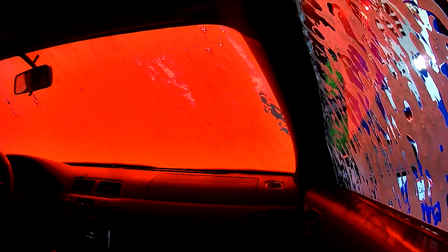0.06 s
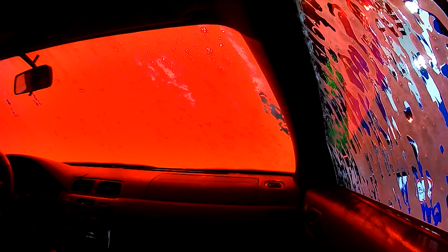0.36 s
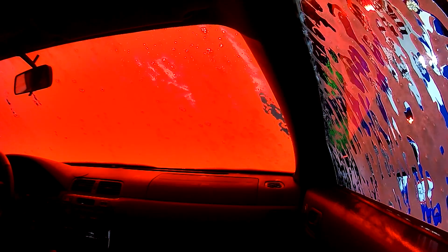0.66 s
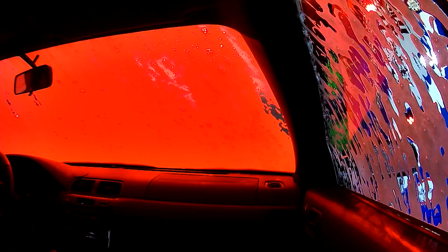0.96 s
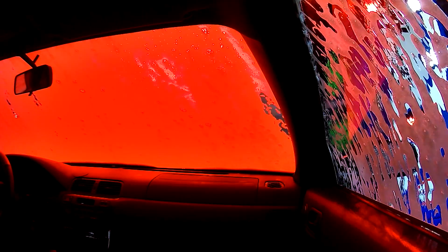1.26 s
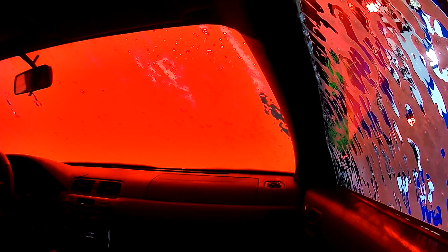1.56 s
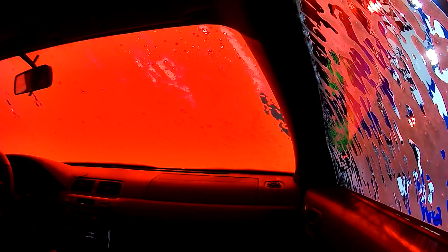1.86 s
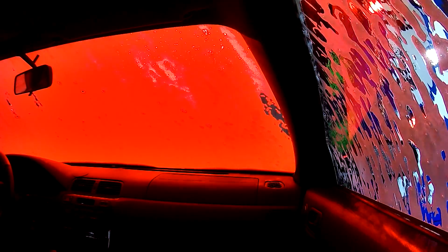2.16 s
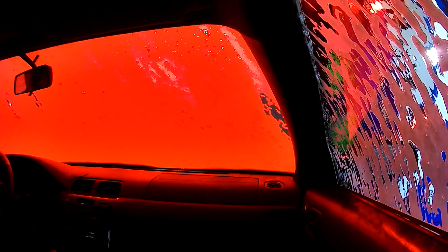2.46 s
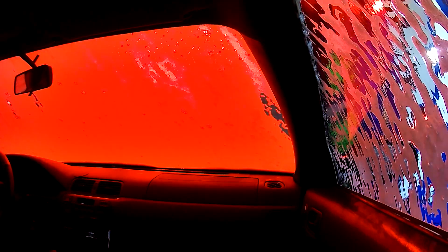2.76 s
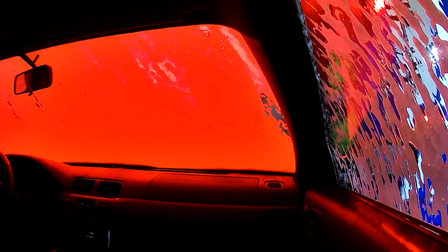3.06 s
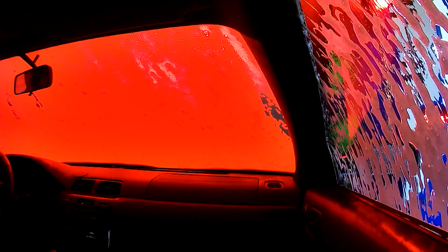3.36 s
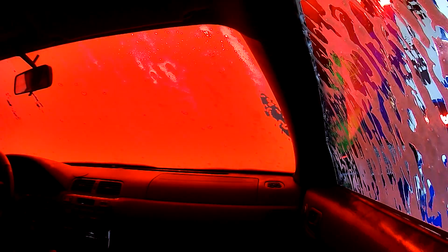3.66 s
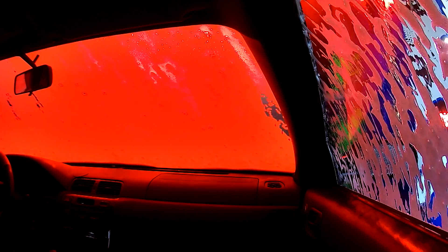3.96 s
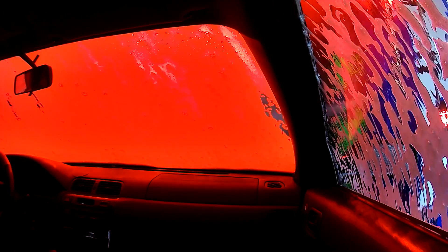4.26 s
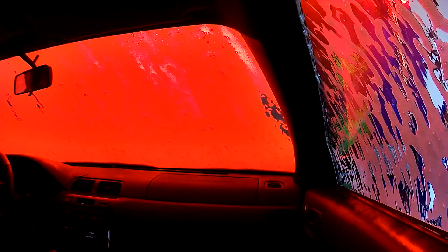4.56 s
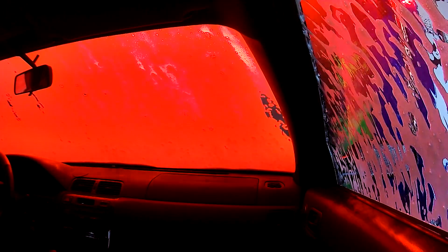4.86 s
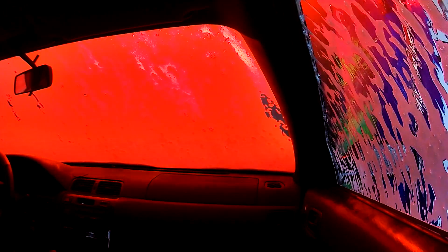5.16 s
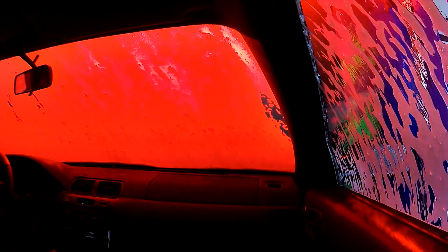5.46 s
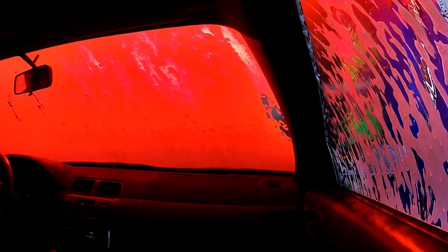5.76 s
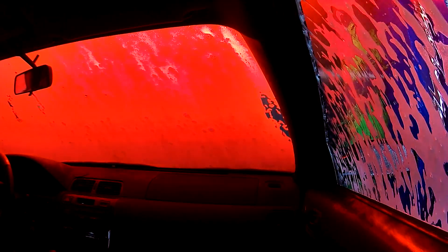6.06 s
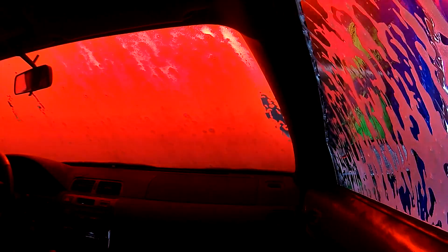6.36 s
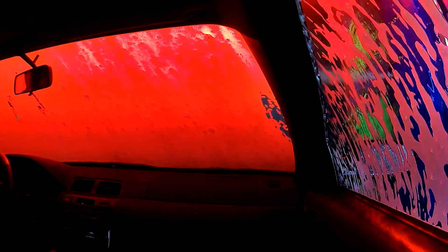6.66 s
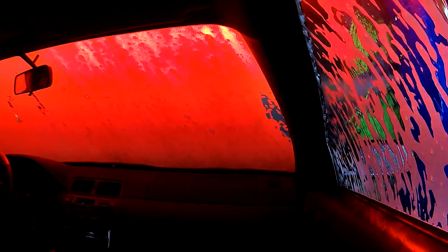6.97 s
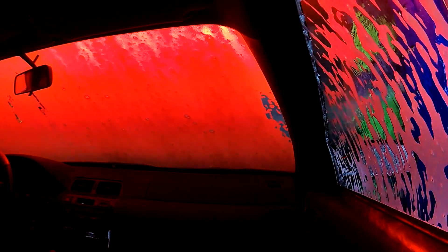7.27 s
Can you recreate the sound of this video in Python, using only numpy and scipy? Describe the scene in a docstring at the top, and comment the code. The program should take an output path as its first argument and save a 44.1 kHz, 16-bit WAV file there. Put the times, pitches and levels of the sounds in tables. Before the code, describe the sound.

Inside a car wash, water patters on the windows while cloth strips thump the panels and swish over the glass, building to a low boom.

```python
"""Car wash from inside

A stereo microphone pair sits in a closed car, glass close on every side, as a rotating brush works
its way in from the right. Wet cloth strips drum on the panels and set the cabin booming; bunches of
them swish and splat over the foamy glass, and some strips land with a heavy slap. Behind it all,
water spray patters steadily on the windows."""
import sys
import numpy as np
from scipy import signal
from scipy.fft import rfft, irfft
from scipy.io import wavfile
from scipy.ndimage import uniform_filter1d

SR = 44100
rng = np.random.default_rng(int(sys.argv[2]) if len(sys.argv) > 2 else 0)


def store_wav(level_fs):
    """Save 16-bit WAV to argv[1]."""
    pcm = np.round(np.clip(np.atleast_2d(level_fs), -1, 1) * 32767)
    wavfile.write(sys.argv[1], SR, pcm.T.astype(np.int16))


N = 323253
TIME = np.arange(N) / SR
HZ = np.maximum(np.arange(N // 2 + 1) * SR / N, 1)

# resonances of the cabin air and of the windows: f/Hz, width/Hz, level/dB re the plain sound
CABIN_MODES = [(68.4, 43, -6.5), (118.7, 8.7, -11), (171.4, 19, -6.5), (274, 4.8, -28.5)]
GLASS_MODES = [(788, 35, -0.5), (900, 17, -13), (1302, 14, -7), (1770, 17, -13.5), (2720, 100, -8),
               (3240, 71, -5.5)]
# stereo balance of the panels and of the glass at the microphones: f/Hz, left minus right/dB
PANEL_BALANCE = [(80, -4.5), (140, -0.5), (320, -1), (420, 5.5), (560, 0)]
GLASS_BALANCE = [(320, -10), (440, -0.5), (650, 0), (1000, 1.5), (1400, -1.5), (2500, -0.5), (3600, -1.5),
                 (5500, 5.5), (9000, 2.5)]


def drumming(strips_per_s=600, gain_db=-0.5):
    """Soft strips beat on the sheet metal; more of them reach it as the brush presses in."""
    approach = [(0, -26), (1.2, -25), (3.3, -24), (4.3, -22), (5.0, -21.5), (5.8, -19.5), (7.33, -20)]  # the brush closing in: t/s, relative level/dB
    colour = [(30, -42.5), (60, -25), (90, -7.5), (115, 0.5), (145, -0.5), (205, 1), (290, 0.5),
              (390, -10.5), (520, -13.5), (740, -20), (1000, -31.5), (1600, -37), (8000, -100)]  # the panels heard from inside: f/Hz, level/dB
    level = from_db(in_time(approach))
    beats = impacts(strips_per_s * level / level.mean(), spread_db=0.0)
    panels = through_body(beats, colour, PANEL_BALANCE, CABIN_MODES)
    return level * from_db(gain_db) * evened(panels, span_s=0.091)


def boom(waver_db=0.65):
    """The brush's weight and shoves pump the cabin's lowest air resonance, from rumble into drone."""
    leaning = [(0, -31), (1.9, -30), (3.0, -34.5), (3.6, -28), (5.0, -28), (5.7, -29.5), (6.05, -22.5),
               (6.35, -24.5), (6.7, -19.5), (7.33, -22.5)]  # weight of the brush on the body: t/s, level/dB
    shoves = [(1.05, -19), (2.41, -22), (4.6, -23), (4.99, -20.5), (5.98, -21), (6.125, -13), (6.2, -18.5),
              (6.455, -21), (6.52, -21.5), (6.8, -19), (7.15, -14)]  # heavier pushes: t/s, level/dB
    colour = [(8, -28), (30, -16.5), (45, -13), (60, -6), (74, -2), (88, -4), (110, -13), (170, -32.5),
              (700, -100)]  # rumble in the cabin: f/Hz, level/dB
    drone_path = [(5.8, 86, 0), (5.97, 83, .3), (6.15, 74, .45), (6.3, 60, .45), (6.48, 73, .45),
                  (6.7, 66, .4), (6.84, 72, .5), (6.98, 68, .35), (7.16, 77, .65), (7.33, 72, .25)]  # the body pressed hard: t/s, f/Hz, share of the boom's power/0-1
    rumble = through_body(impacts(700, spread_db=-1.0), colour, modes=CABIN_MODES)
    rumble = evened(rumble, span_s=0.11)
    hz, share = in_time(drone_path)
    power = from_db(in_time(leaning) + waver_db * drift(18.0)) ** 2
    power = power + sum((from_db(db) * bell(s, length_s=0.026)) ** 2 for s, db in shoves)
    drone = wavering(hz, waver=0.055, rate=12.5)
    return np.sqrt(power) * (np.sqrt(1 - share) * rumble + np.sqrt(share) * drone)


def slaps(rise_s=0.0035):
    """Single water-laden strips land softly on a panel, whose pitch depends on the spot they hit."""
    landings = [(0.598, -14, 194), (1.14, -15, 161), (1.312, -12, 148), (1.425, -16, 135), (1.849, -9, 167),
                (2.275, -16, 127), (2.397, -21, 290), (2.588, -15, 156), (2.677, -21, 310),
                (2.887, -19, 149), (2.974, -17, 145), (3.027, -23, 468), (3.108, -17, 233),
                (3.202, -22, 355), (3.471, -24, 506), (3.758, -16, 153), (4.019, -10.5, 170),
                (4.362, -14, 400), (4.492, -16, 240), (4.558, -13, 125), (4.626, -12, 250),
                (4.889, -13.5, 249), (5.107, -14, 273), (5.233, -14.5, 194), (5.386, -15, 425),
                (5.691, -11, 320), (5.836, -12, 250), (5.89, -11, 131), (5.952, -12, 180),
                (6.081, -12, 191), (6.103, -17, 537), (6.168, -7, 174), (6.189, -14, 335), (6.56, -11, 170),
                (6.632, -13, 258), (6.76, -14, 345), (6.779, -10, 158), (6.93, -15, 310), (7.255, -11, 170),
                (7.279, -13, 334)]  # heavy strips: t/s, peak level/dB, f/Hz
    panel_modes = [(.47, -15, .09), (.76, -9, .055), (1, 0, .075), (1.5, -8, .04), (2.0, -13, .03),
                   (2.86, -19, .02)]  # ring of the panel: multiple of f, level/dB, t60/s
    t = np.arange(SR // 8) / SR
    out = np.zeros(N + len(t))
    for s, peak_db, hz in landings:
        scatter_db = rng.standard_normal(len(panel_modes))
        knock = sum(from_db(db + scatter - 60 * t / t60) * np.sin(2 * np.pi * hz * multiple * t)
                    for (multiple, db, t60), scatter in zip(panel_modes, scatter_db))
        knock = knock * (1 - np.exp(-t / rise_s))
        at = round(s * SR)
        out[at:at + len(t)] += from_db(peak_db) * knock / np.abs(knock).max()
    return out[:N]


def bunches():
    """Each bunch of strips swells and fades as it sweeps by; the summed power of (sliding, striking)."""
    # one bunch a turn at first, then several as the brush presses in:
    # t/s, length/s, relative sliding level/dB, relative striking level/dB
    sweeps = [(2.417, 0.024, -42, -41), (2.488, 0.033, -49, -40), (2.75, 0.067, -43.5, -40),
              (3.014, 0.13, -44.5, -41), (3.268, 0.098, -40.5, -46), (3.55, 0.066, -42, -40.5),
              (3.81, 0.058, -37, -42.5), (4.097, 0.044, -32.5, -32.5), (4.358, 0.042, -32.5, -37),
              (4.63, 0.029, -32.5, -36), (4.69, 0.024, -45, -32), (4.883, 0.033, -37, -31),
              (4.915, 0.025, -32.5, -37), (4.958, 0.039, -32.5, -34.5), (5.055, .04, -43, -38),
              (5.123, 0.043, -36.5, -32), (5.193, 0.069, -31, -33), (5.243, 0.024, -32, -33),
              (5.307, .04, -44, -36), (5.36, 0.016, -41, -32.5), (5.4, 0.025, -44, -28.5),
              (5.458, 0.03, -32, -30), (5.508, 0.045, -33, -39), (5.567, 0.022, -36, -35),
              (5.637, 0.016, -32.5, -34), (5.672, 0.019, -31, -32), (5.752, 0.043, -34, -30),
              (5.835, 0.016, -41, -30), (5.903, 0.014, -31.5, -36), (5.936, 0.035, -37, -37),
              (6.028, 0.05, -32, -38), (6.107, 0.04, -39, -34.5), (6.19, 0.025, -32.5, -33),
              (6.312, 0.05, -40, -33.5), (6.374, 0.019, -34.5, -31.5), (6.406, 0.017, -34, -31.5),
              (6.471, 0.031, -35, -32), (6.588, 0.027, -34.5, -31), (6.653, 0.036, -35, -29),
              (6.733, 0.046, -36.5, -32), (6.852, 0.025, -35, -34), (6.914, 0.028, -37, -32),
              (6.954, 0.02, -42, -30.5), (7, 0.027, -32, -39), (7.037, 0.023, -34, -35),
              (7.123, 0.027, -33, -38), (7.195, 0.051, -35.5, -35.5), (7.279, 0.049, -34.5, -33)]
    return sum(np.outer(from_db(db), bell(s, length)) ** 2 for s, length, *db in sweeps)


def thudding(bunch_power, strips_per_s=700, gain_db=3.0):
    """The heavy ends of each bunch hit the door in a short, hollow roll."""
    colour = [(80, -37.5), (250, -8.5), (390, 6), (540, -1.5), (680, -7), (750, -14), (850, -10.5),
              (1200, -27), (6000, -90.5)]  # the door heard from inside: f/Hz, level/dB
    roll = through_body(impacts(strips_per_s, spread_db=3.0), colour, PANEL_BALANCE, GLASS_MODES)
    return np.sqrt(bunch_power) * from_db(gain_db) * evened(roll, span_s=0.079)


def swishing(bunch_power, slips_per_s=5000, flutter_db=1.56, gain_db=6.0):
    """Wet cloth slips over the glass in countless tiny jerks, swelling as each bunch sweeps by."""
    drag = [(0, -44), (1.5, -42.5), (3.4, -42.5), (4.2, -40), (4.7, -36), (5.2, -36), (6, -35), (6.6, -36),
            (7.33, -35.5)]  # strips trailing on the glass between bunches: t/s, relative level/dB
    colour = [(40, -52.5), (150, -12.5), (330, 5), (420, 4), (540, 6), (680, 1.5), (745, -5), (950, -2.5),
              (1180, -6.5), (2100, -11.5), (3300, -18), (4100, -21), (5300, -36.5), (6500, -39),
              (9000, -48), (15000, -57)]  # cloth heard through the glass: f/Hz, level/dB
    power = from_db(in_time(drag)) ** 2 + bunch_power
    slips = impacts(slips_per_s, spread_db=2.5) * from_db(flutter_db * drift(41))
    slips = cabin_echo(evened(slips, span_s=0.11), echo_db=-8.0)
    glass = through_body(slips, colour, GLASS_BALANCE, GLASS_MODES)
    return np.sqrt(power) * from_db(gain_db) * glass


def splatting(bunch_power, strips_per_s=900, wander_db=5.5, crack_db=-1.5):
    """Wet strips smack the side window; its hollow ring shifts as they land on different spots."""
    pane_modes = [(665, 0), (815, 2.5), (940, 2.5), (1070, -8), (1300, -6.5), (1775, -5.5)]  # ring of the side window: f/Hz, level/dB
    colour = [(300, -9), (650, 2), (1200, -0.5), (2400, -3.5), (3800, -8), (5300, -27), (9000, -46.5),
              (15000, -62.5)]  # smacks heard through the glass: f/Hz, level/dB
    hits = cabin_echo(impacts(strips_per_s, spread_db=1.5), echo_db=-6.5)
    pane = sum(from_db(db + wander_db * drift(7.2)) * ring(hits, hz, t60_s=0.025) * (-1) ** k
               for k, (hz, db) in enumerate(pane_modes))
    splats = through_body(unit_rms(pane) + from_db(crack_db) * hits, colour, GLASS_BALANCE)
    return np.sqrt(bunch_power) * evened(splats, span_s=0.047)


def catching(rough_db=0.9):
    """A sticking strip rubs one mode of glass or metal into a brief, slightly rough note."""
    catches = [(3.51, 489, 0.01, -23.5), (4.088, 825, 0.036, -32), (4.363, 404, 0.0089, -23),
               (4.905, 930, 0.029, -38), (5.38, 1770, 0.05, -50), (5.499, 833, 0.027, -31.5),
               (5.775, 854, .04, -35), (6.043, 1300, 0.021, -39), (6.19, 800, .022, -39),
               (6.96, 424, 0.062, -30)]  # strips that stick: t/s, f/Hz, length/s, level/dB
    return sum(from_db(db + rough_db * drift(70)) * bell(s, length)
               * wavering(hz, waver=0.0141, rate=59.7) for s, hz, length, db in catches)


def splashing(drops_per_s=4000):
    """The wettest bunches fling water that breaks on the side window in a bright burst of drops."""
    splashes = [(3.82, 0.056, -54), (4.946, 0.039, -48), (5.2, .08, -51), (5.755, .05, -46.5),
                (6.036, .04, -45), (6.298, 0.045, -46), (7.127, 0.021, -50)]  # sheets of water: t/s, length/s, level/dB
    colour = [(800, -9), (2000, -2), (3800, 4), (5200, -12), (7000, -15.5), (9000, -30), (14000, -47.5)]  # water heard through the glass: f/Hz, level/dB
    level = sum(from_db(db) * bell(s, length) for s, length, db in splashes)
    drops = cabin_echo(impacts(drops_per_s, spread_db=2.5), echo_db=-10.0)
    return level * through_body(drops, colour, GLASS_BALANCE)


def spray(drops_per_s=9000, level_db=-43.5, surge_db=0.66, waver_db=0.34, flutter_db=0.5):
    """Fine drops on the windows merge into a fizzing hiss that surges with each turn of the brush."""
    colour = [(300, 5.5), (900, 8), (1500, -2.5), (2100, 1), (3100, 4.5), (4000, 2.5), (4600, -6),
              (5400, -17.5), (6400, -18), (8000, -26.5), (11000, -53)]  # spray heard through the glass: f/Hz, level/dB
    balance = [(1000, -3), (2800, -1.5), (3800, -2.5), (5000, 7.5), (8000, 0)]  # its stereo balance: f/Hz, left minus right/dB
    turn_s, peak_at_s = 0.272, 3.02
    drops = cabin_echo(impacts(drops_per_s, spread_db=2.5), echo_db=-18.0)
    drops = drops * from_db(flutter_db * drift(25))
    turn = np.cos(2 * np.pi * (TIME - peak_at_s) / turn_s)
    level = from_db(level_db + surge_db * turn - waver_db * drift(2.7))
    return level * through_body(drops, colour, balance, GLASS_MODES)


def through_body(force, colour, balance=None, modes=()):
    """Two force trains cross panel or glass and reach the microphones as mid and side; rms 1."""
    likeness = [(60, 1), (130, 1), (300, 0.86), (520, 0.73), (720, 0.061), (1200, -0.41), (1800, -0.4),
                (2600, -0.051), (5000, -0.011)]  # how alike left and right are in the cabin: f/Hz, correlation
    response = 1 + sum(from_db(db) / (1 + 2j * (HZ - hz) / width) for hz, width, db in modes)
    mid, side = rfft(force) * response * from_db(over_hz(colour))
    alike = np.clip(over_hz(likeness), -1, 1)
    left_right = np.array([[1], [-1]])
    pair = np.sqrt(1 + alike) * mid + np.sqrt(1 - alike) * side * left_right
    if balance is not None:
        pair = pair * from_db(over_hz(balance) * left_right / 2)
    return unit_rms(irfft(pair, N))


def cabin_echo(force, echo_db, t60_s=0.074):
    """Glass close around the microphones throws each tick back as a short, dense tail."""
    t = np.arange(int(0.12 * SR)) / SR
    tail = rng.standard_normal((2, len(t))) * from_db(-60 * t / t60_s)
    tail = tail / np.sqrt(np.sum(tail ** 2, axis=1, keepdims=True))
    return force + from_db(echo_db) * signal.fftconvolve(force, tail, axes=1)[:, :N]


def from_right(pair, lag_s=0.00025):
    """Blows on the right side of the car reach the left microphone later."""
    return np.array([np.interp(TIME - lag_s, TIME, pair[0]), pair[1]])


def impacts(per_s, spread_db):
    """Two trains of random contacts; the power stays 1 whatever their rate."""
    sizes = from_db(spread_db * np.minimum(rng.exponential(1, (2, N)), 4))
    lands = rng.random((2, N)) < per_s / SR
    return unit_rms(lands * sizes * rng.choice([-1, 1], (2, N)) / np.sqrt(per_s))


def ring(clicks, hz, t60_s):
    """Each click sets a decaying sine ringing."""
    r, w = from_db(-60 / (t60_s * SR)), 2 * np.pi * hz / SR
    return signal.lfilter([0, np.sin(w)], [1, -2 * r * np.cos(w), r * r], clicks + 1e-18)


def wavering(hz, waver, rate):
    """A sine of rms 1 whose pitch strays at random by the share `waver`."""
    return np.sqrt(2) * np.sin(2 * np.pi * np.cumsum(hz * (1 + waver * drift(rate))) / SR)


def drift(rate):
    """A random wander of rms 1, smoothed above `rate` Hz."""
    step, settle = 40, 2000
    r = np.exp(-2 * np.pi * rate * step / SR)
    noise = rng.standard_normal(N // step + settle + 2)
    slow = signal.lfilter([1], [1, -2 * r, r * r], noise)[settle:]
    return np.interp(np.arange(N) / step, np.arange(len(slow)), unit_rms(slow))


def bell(s, length_s):
    """A swell of height 1 at time s, whose power halves half a length to either side."""
    return 0.5 ** np.minimum(2 * ((TIME - s) / length_s) ** 2, 40)


def evened(x, span_s):
    """Take out slow chance swells, leaving the fast grain."""
    power = uniform_filter1d(np.mean(x ** 2, axis=0), int(span_s * SR))
    return x / np.sqrt(power + 1e-9)


def in_time(rows):
    """The curve or curves of a table, read at every sample."""
    times, *columns = np.transpose(rows)
    return np.squeeze([np.interp(TIME, times, column) for column in columns])


def over_hz(points):
    """A table, read at every frequency on a log axis."""
    hz, values = np.transpose(points)
    return np.interp(np.log(HZ), np.log(hz), values)


def from_db(db):
    """Decibels to gain."""
    return 10 ** (np.asarray(db) / 20)


def unit_rms(x):
    """Scale to rms 1."""
    return x / np.sqrt(np.mean(x ** 2) + 1e-20)


def scene():
    """Everything reaches the microphones through the panels and the windows of the car."""
    sliding, striking = bunches()
    body = drumming() + boom() + slaps() + thudding(striking)
    glass = splatting(striking) + swishing(sliding) + catching() + splashing() + spray()
    return from_right(body) + glass


def record(dry):
    """The microphones lose the deepest bass and add a faint hiss; the ends are eased, the top is cut."""
    low_cut_hz, high_cut_hz, fade_s, hiss_db = 49, 15750, 0.003, -66.5
    heard = signal.sosfilt(signal.butter(2, low_cut_hz, "high", fs=SR, output="sos"), dry)
    heard = heard * np.minimum(np.minimum(TIME, TIME[-1] - TIME) / fade_s, 1)
    heard = heard + from_db(hiss_db) * rng.standard_normal((2, N))
    return signal.sosfilt(signal.ellip(10, 0.1, 80, high_cut_hz, fs=SR, output="sos"), heard)


dry = scene()
out = record(dry)
store_wav(out)
```